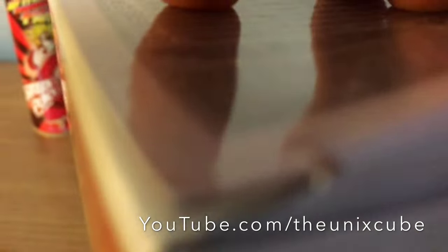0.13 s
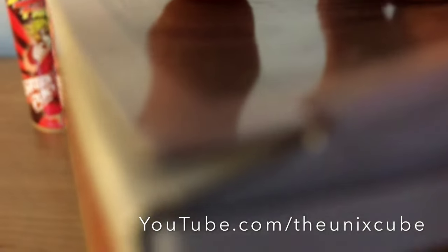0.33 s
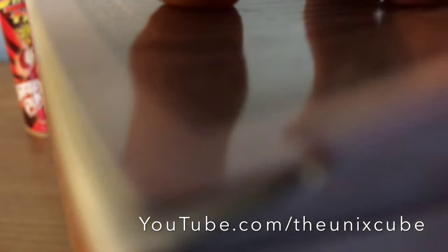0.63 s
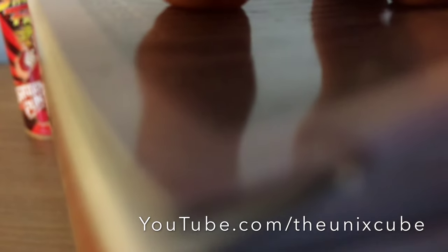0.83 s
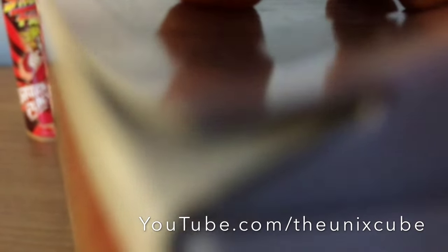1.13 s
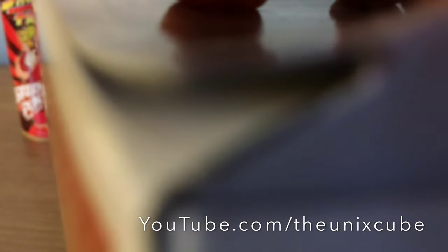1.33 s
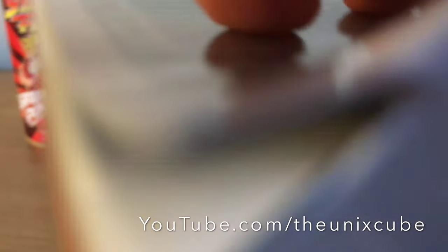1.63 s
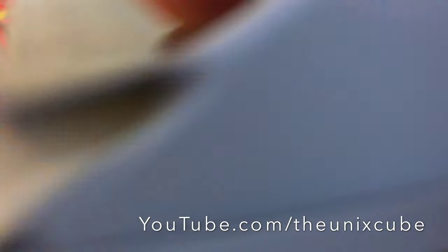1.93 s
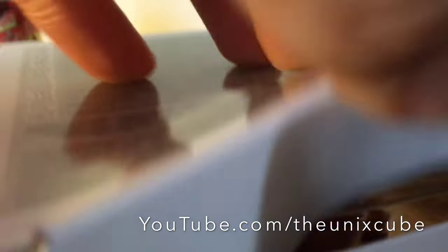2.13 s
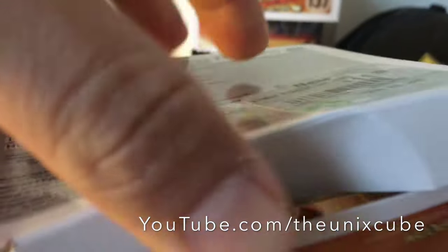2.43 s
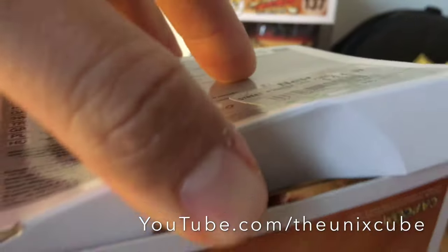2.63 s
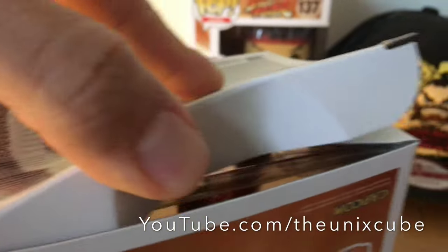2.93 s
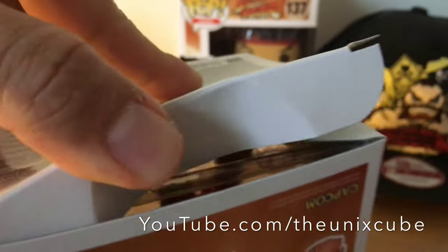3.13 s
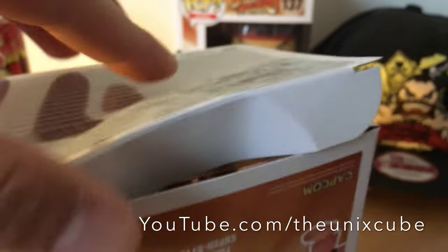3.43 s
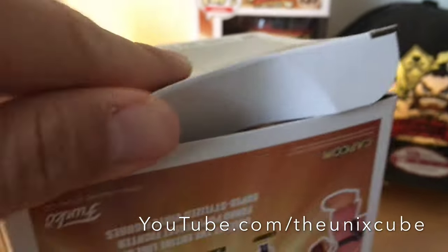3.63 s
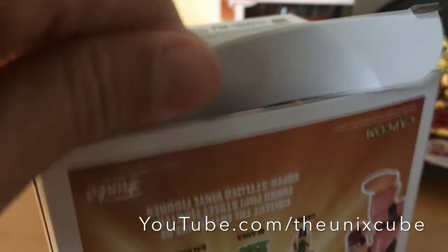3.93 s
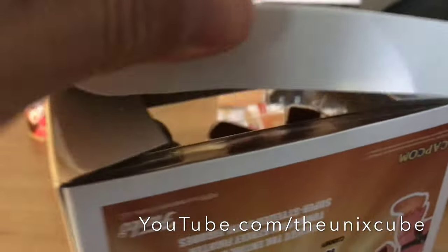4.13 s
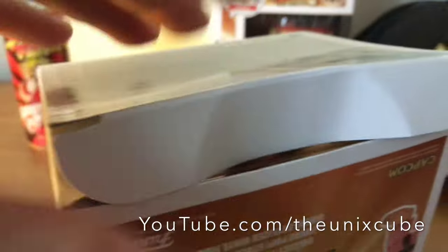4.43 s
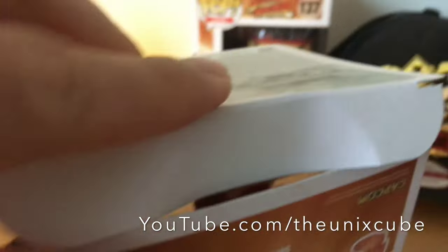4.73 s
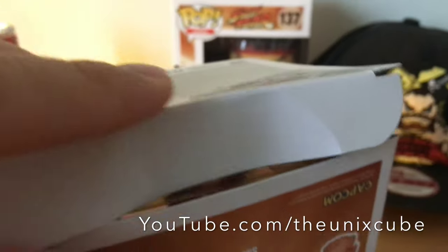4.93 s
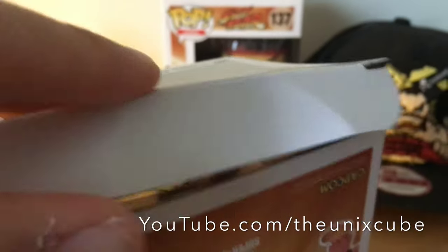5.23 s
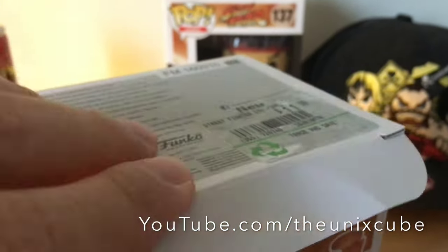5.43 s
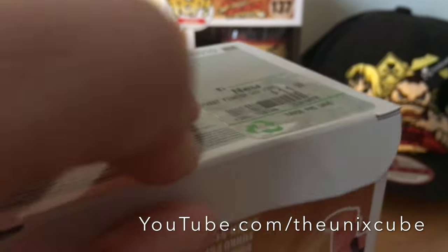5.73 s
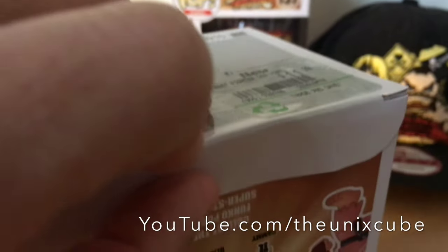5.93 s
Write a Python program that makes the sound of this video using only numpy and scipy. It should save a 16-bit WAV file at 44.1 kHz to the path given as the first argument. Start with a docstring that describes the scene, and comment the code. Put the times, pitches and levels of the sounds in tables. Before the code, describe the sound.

Fingers tap and scratch a small cardboard box up close, its tight flap creaking free in jerky steps with sharp hollow snaps in a quiet room.

```python
"""Faint taps and scratches come first, close to the microphone in a quiet room: fingers on a small cardboard box.
The tuck flap creaks out of its slot in stick-slip steps, and panels buckle or spring free with sharp snaps.
Each contact sums a bouncing patch of card, ringing box modes and a noisy wash of bending waves.
Strokes, a side tab rasping past the rim and handling are coloured friction noise.
Behind them lie the room's echo, still air, a faint mains hum and the microphone's hiss."""
import sys
import numpy as np
from scipy import signal
from scipy.fft import rfft, irfft
from scipy.io import wavfile

SR = 44100
rng = np.random.default_rng(int(sys.argv[2]) if len(sys.argv) > 2 else 0)


def materialize(psi):
    """Save the field psi as 16-bit PCM at rate SR to the path in sys.argv[1].

    A 1-D psi becomes a single channel; in a 2-D psi each row is a channel.
    """
    bounded = np.clip(np.atleast_2d(psi).T, -1, 1)
    quanta = np.round(bounded * 32767).astype(np.int16)
    wavfile.write(sys.argv[1], SR, quanta)


N = 268128
TIME = np.arange(N) / SR
CUTOFF_HZ = 16000


# the card buckles or springs free, close to the microphone; levels are before the trim in snaps():
# [t/s, body level/dB, thud, panel, flap and crack level/dB over the body,
#  bounce level/dB over the ring, hollow (body) bounce f/Hz, edge (flap) bounce f/Hz]
PANEL_SNAPS = [(1.6585, -13, -1.5, -2, -11.5, -5, 2.8, 489, 2647),
               (1.964, -19.5, -3, -8, -7, -13, 2.3, 520, 3340),
               (2.2294, -21.5, -1.5, 2.5, 5.5, -14, 2.8, 520, 2480),
               (3.269, -22, -10.5, -3, 3, -16.5, 3.9, 539, 2640),
               (4.0015, -22, -11.5, -4.5, -5, 0, 1.7, 662, 2540),
               (4.0742, -21, -2.5, -2.5, -6, 1, 1, 415, 2640),
               (4.3443, -23.5, -12, -2.5, -8, -19, 2.8, 690, 2570),
               (5.8516, -15, -12.5, -18, -17, -21.5, 4.3, 407, 2430)]


def snaps():
    """A panel flips over: its own bounce outweighs the ring of the box."""
    rows = np.array(PANEL_SNAPS)
    pitches = patch_pitches(rows, octaves=.15)
    bounce_db, pitches[:, 1], pitches[:, 3] = rows[:, -3:].T
    sound = strike(rows[:, :-3], pitches, damping=1.2, crush_s=0.00038,
                   bounce_db=bounce_db[:, None], flex_db=-2, fine_db=3.5)
    return from_db(-1.08) * sound


# the tuck flap jerks along its slot: [t/s, body level/dB before the trim in creak()]
FLAP_SLIPS = [(1.093, -40), (1.112, -42.5), (1.130, -37.5), (1.159, -40.5), (1.169, -37.5), (1.200, -40),
              (1.210, -39.5), (1.2415, -31), (1.265, -35), (1.277, -33.5), (1.291, -37.5), (1.3259, -28.5),
              (1.3317, -34), (1.4038, -27), (1.4306, -29.5), (1.4388, -33), (1.4616, -28.5), (1.5008, -28),
              (1.508, -33.5), (1.5392, -27.5), (1.551, -33), (1.5726, -28.5), (1.614, -26), (1.619, -32.5),
              (1.6388, -33.5), (1.6651, -24.5), (1.675, -29.5)]
# a harder slip is brighter; rows are thud, panel, flap, crack:
# [level/dB over the body in a firm slip, dB gained per dB of force]
FORCE_COLOUR = [(-4.5, -0.07), (0, .5), (-10, 1.06), (-15.5, 0.73)]
FIRM_SLIP_DB = -28.5
# after each slip the flap stutters once more, weaker; the mean gap is given
STUTTER_S, STUTTER_LOSS_DB = 0.0053, 5.5


def creak():
    """The flap sticks and slips along its slot; harder slips carry more treble."""
    slips = np.array(FLAP_SLIPS)
    firm_db, per_db = np.transpose(FORCE_COLOUR)
    colour_db = firm_db + per_db * (slips[:, 1:] - FIRM_SLIP_DB)
    rows = repeated(np.c_[slips, colour_db], STUTTER_S, STUTTER_LOSS_DB)
    pitches = patch_pitches(rows, octaves=.45)
    sound = strike(rows, pitches, damping=0.94, crush_s=.00015, bounce_db=-1.0, flex_db=-0.5, fine_db=3.5)
    return from_db(-0.16) * sound


# fingertips and nails land on the card; levels are before the trim in touches():
# [t/s, body level/dB, thud of the pad level/dB over the body, brightness of the nail/dB]
FINGER_TOUCHES = [(0.072, -62, 16, -13), (0.274, -49.5, -2, -9.5), (0.340, -59, 11.5, -2),
                  (0.359, -68.5, 19, -18), (0.410, -59.5, 0, 0.5), (0.676, -47.5, 5, -56),
                  (0.777, -56, 2.5, -22), (0.824, -50.5, 10, -50), (0.855, -49, 6.5, -6.5),
                  (0.907, -52, 2, -10), (0.940, -48.5, 3.5, -22.5), (1.002, -53.5, 12, -5.5),
                  (1.021, -38.5, -3, -46), (1.070, -56.5, 17.5, -7.5), (1.367, -59, -5, -1),
                  (1.396, -47, -3, -8), (1.731, -61.5, 0, 9.5), (1.858, -54.5, -2, -9),
                  (2.087, -45.5, -17, -11.5), (2.136, -40, -1, -11), (2.153, -32.5, -12, -27),
                  (2.165, -32.5, -2.5, -19), (2.174, -33.5, -8, -14.5), (2.19, -43, -4, -14),
                  (2.371, -43.5, 3, -18), (2.596, -57, 3, -16.5), (2.796, -55.5, -0.5, -5.5),
                  (3.183, -57, 4.5, -0.5), (3.350, -51.5, 6.5, -8.5), (3.470, -45.5, 2.5, -16.5),
                  (3.507, -51.5, -1, -10.5), (3.548, -43.5, -1.5, -15), (3.565, -48, -6.5, -16.5),
                  (3.828, -55, -2.5, -15.5), (3.969, -42, 1, -9), (4.146, -47.5, -2, -20),
                  (4.193, -54, 10.5, -29), (4.259, -54, -18, -8.5), (4.338, -39.5, 5.5, -9),
                  (4.389, -40.5, -2, -25), (4.408, -44.5, -8.5, -33), (4.438, -48, -2, -26.5),
                  (4.556, -48.5, 4, -15.5), (4.587, -58.5, 9, -4), (4.639, -43, -1.5, -21.5),
                  (4.668, -47, -8, -44), (4.724, -42, 0.5, -20), (4.814, -45.5, -3.5, -26.5),
                  (4.862, -58, 7.5, -5), (4.883, -46.5, 8.5, -11), (4.922, -39.5, -4, -19.5),
                  (5.126, -50.5, -12.5, -27), (5.153, -45, -8, -12.5), (5.170, -38, -16, -10),
                  (5.193, -39.5, -13.5, -13), (5.368, -60, 0, -21.5), (5.417, -59.5, 8, -11.5),
                  (5.446, -50, -7.5, -9), (5.496, -38.5, -16, -36), (5.5385, -50.5, 1, -5),
                  (5.584, -47.5, 5, -20.5), (5.692, -58.5, 2, -1.5), (5.756, -42.5, -1, -32),
                  (5.774, -47, -14, -55), (5.792, -54, 6, -14)]
# the more nail, the more treble; rows are panel, flap, crack: [level/dB over the body, share of the brightness]
NAIL_COLOUR = [(1.5, 0.3), (3, 1.0), (0.5, 1.0)]
# a finger settles with one more, softer contact; the mean gap is given
SETTLE_S, SETTLE_LOSS_DB = 0.01, 12


def touches():
    """Light taps and picks on the card: the pad gives the thud, the nail the treble."""
    taps = repeated(FINGER_TOUCHES, SETTLE_S, SETTLE_LOSS_DB)
    base_db, share = np.transpose(NAIL_COLOUR)
    rows = np.c_[taps[:, :3], base_db + share * taps[:, 3:]]
    pitches = patch_pitches(rows, octaves=.4)
    sound = strike(rows, pitches, damping=0.99, crush_s=.0007, bounce_db=-3, flex_db=2.0, fine_db=1.5)
    return from_db(0.48) * sound


def repeated(rows, gap_s, loss_db):
    """Follow each contact (s, dB, ..) with one weaker contact at an uneven gap."""
    first = np.array(rows, float)
    again = first.copy()
    again[:, 0] += gap_s * rng.uniform(.7, 1.3, len(first))
    again[:, 1] -= loss_db
    return np.vstack([first, again])


# the patch of card under a contact, one row per register, before pitch scatter and damping:
# [bounce f/Hz, bounce t60/s, bending-wave t60/s]
CARD_PATCH = [(220, .028, .075), (480, .014, .05), (1300, .008, .033), (2500, .007, .022),
              (4100, .003, .024)]


def patch_pitches(contacts, octaves):
    """Every contact finds patches of a different size: (contacts, registers) in Hz."""
    size = rng.uniform(-1, 1, (len(contacts), len(CARD_PATCH)))
    return np.array(CARD_PATCH)[:, 0] * 2 ** (octaves * size)


# edges of the thud, body, panel, flap and crack registers: [f/Hz]
REGISTER_EDGES = [55, 280, 750, 1900, 3300, 15900]
# modes of the box: [f/Hz, level/dB relative within its register, t60/s at damping 1]
BOX_MODES = [(61, -13, 0.04), (116, -5, 0.04), (204.5, 6, 0.037), (266.2, 0, 0.034), (352, -0.5, 0.099),
             (372, -6.5, 0.048), (457, 5, 0.038), (591, 10.5, 0.021), (648.7, 2, 0.074), (925, -5, 0.054),
             (996, -3.5, 0.018), (1117, 0, 0.034), (1620, -5, 0.014), (1570, 0.5, 0.018), (1810, -4, 0.018),
             (1980, 5, 0.011), (2480, 1.5, 0.024), (2500, -9.5, 0.006), (3550, -2.5, 0.011),
             (4070, -1, 0.0075), (6070, -6, 0.0063), (8800, -3.5, .002)]
# random spread of a mode's strength with the place of contact (standard deviation, dB)
SCATTER_DB = 3
# a soft contact loses its highest waves: dB of them per dB of crack
SOFTNESS = 0.62


def strike(rows, pitches, damping, crush_s, bounce_db, flex_db, fine_db):
    """Each contact bounces a patch of card, rings the box modes and leaves a short wash of bending waves."""
    t = np.arange(SR // 10) / SR
    # the body is the reference, 0 dB over itself
    levels = rows[:, 1:2] + np.insert(rows[:, 2:], 1, 0, axis=1)
    # the fibres give way over a moment
    crush = 1 - np.exp(-t / crush_s)
    sounds = np.zeros((len(rows), len(t)))
    for k, (low, high) in enumerate(zip(REGISTER_EDGES, REGISTER_EDGES[1:])):
        _, bounce_t60, flex_t60 = CARD_PATCH[k]
        bounce = np.sin(2 * np.pi * pitches[:, k:k + 1] * t) * dying(t, bounce_t60)

        hz, db, t60 = np.transpose([mode for mode in BOX_MODES if low <= mode[0] < high])
        modes = np.sin(2 * np.pi * hz[:, None] * t) * dying(t * damping, t60[:, None])
        strengths = from_db(db + SCATTER_DB * rng.standard_normal((len(rows), len(hz))))
        # a contact falls on either side of a mode's nodal line
        ring = (strengths * rng.choice([-1, 1], strengths.shape)) @ modes

        wash = rng.standard_normal(sounds.shape) * crush * dying(t * damping, flex_t60)
        flex = band(wash, low, high, order=1)
        is_crack = high == REGISTER_EDGES[-1]
        wash_db = fine_db + SOFTNESS * rows[:, -1:] if is_crack else flex_db

        wave = unit_energy(ring)
        wave = wave + from_db(bounce_db) * unit_energy(bounce)
        wave = wave + from_db(wash_db) * unit_energy(flex)
        # neighbouring registers have opposite polarity
        sounds += (-1) ** k * from_db(levels[:, k:k + 1]) * unit_energy(band(wave, low, high))
    # levels are rms over 10 ms
    sounds *= np.sqrt(SR / 100)
    out = np.zeros(N + len(t))
    for s, sound in zip(rows[:, 0], sounds):
        start = round(s * SR)
        out[start:start + len(t)] += sound
    return out[:N]


# the side tab dragged past the rim: [t/s, level/dB]
TAB_DRAG = [(3.995, -50), (4.004, -29), (4.016, -25.5), (4.026, -24.5), (4.046, -21.5), (4.054, -25.5),
            (4.072, -38.5), (4.08, -85.5)]
# colour of the rasp: [f/Hz, relative level/dB per Hz]
TAB_COLOUR = [(60, -2.5), (130, -3), (400, -7), (640, 0), (850, -11.5), (1600, -10), (2400, -2),
              (3100, -14), (4800, -15.5), (6000, -8.5), (7500, -15), (9500, -16), (15500, -29.5)]


def tab_rasp():
    """The cut edge of the tab runs fast over the rim, catching as it goes."""
    moving = (TIME > TAB_DRAG[0][0]) & (TIME < TAB_DRAG[-1][0])
    # the catching swings the level by 2.2 dB rms
    catching = from_db(2.2 * rms_one(band(rng.standard_normal(N), 60, 260, order=2)))
    grain = coloured(catching * fibres(per_s=16000, spread_db=1.0), TAB_COLOUR)
    return moving * gain_curve(TAB_DRAG) * grain


# fingers and card edges rubbing, and the card crunching just before the snaps at 1.96 s and 5.85 s: [start t/s,
# end t/s, mid-stroke level/dB, treble gain/dB]
RUB_STROKES = [(0.436, 0.535, -62, -10), (1.074, 1.29, -51, -10.5), (1.384, 1.5, -50.5, -4),
               (1.627, 1.696, -24.5, -43), (1.953, 1.985, -27, -10.5), (2.074, 2.177, -40.5, -39),
               (2.146, 2.256, -40.5, -7.5), (2.865, 2.996, -61, -3.5), (3.214, 3.3, -53, -4.5),
               (3.63, 3.75, -61, -8), (3.847, 3.981, -55.5, -9), (4.057, 4.166, -45, -17),
               (4.288, 4.332, -55, 10.5), (4.537, 4.652, -51.5, -8), (5.149, 5.188, -38, -6.5),
               (5.437, 5.457, -47.5, 8.5), (5.481, 5.512, -37, -1.5), (5.702, 5.775, -72.5, 17),
               (5.843, 5.862, -28, -5.5)]
# colour of rubbing before each stroke's treble gain: [f/Hz, relative level/dB per Hz]
RUB_COLOUR = [(50, -5.5), (120, -6), (220, 1.5), (400, -4), (620, 1), (820, -9), (1200, -10), (2500, -13),
              (4500, -17.5), (9000, -23.5), (15000, -33.5)]
# a stroke catches and lets go: rms swing of its level (dB)
RUB_CATCH_DB = 3


def rubbing():
    """Short strokes over the card, catching unevenly, and brief crunches of card just before two snaps; a nail
    or a cut edge is brighter than a fingertip."""
    catching = from_db(RUB_CATCH_DB * rms_one(band(rng.standard_normal(N), 30, 180, order=2)))
    grain = coloured(catching * fibres(per_s=4000, spread_db=1.2), RUB_COLOUR)
    dull = signal.sosfiltfilt(signal.butter(2, 2200, fs=SR, output="sos"), grain)
    treble = grain - dull
    out = np.zeros(N)
    for start, end, level_db, bright_db in RUB_STROKES:
        progress = np.clip((TIME - start) / max(end - start, .005), 0, 1)
        pressure = np.sqrt(np.abs(np.sin(np.pi * progress)))
        out += from_db(level_db) * pressure * (dull + from_db(bright_db) * treble)
    return out


# the box shifts in the hands:
# [start t/s, end t/s, rustle of skin level/dB, hiss of sliding card level/dB]
HAND_SHIFTS = [(0.906, 1.68, -56, -87), (1.675, 2.25, -55.5, -63), (3.3, 3.62, -57.5, -70.5),
               (4.05, 4.47, -64.5, -60.5), (4.548, 4.95, -69.5, -80.5), (5.416, 5.602, -54, -69),
               (5.7, 5.994, -62, -78.5)]
# colour of skin on the hollow box: [f/Hz, relative level/dB per Hz]
SKIN_COLOUR = [(40, -6.5), (70, 7.5), (130, 5), (250, 2), (600, -2), (850, -5.5), (1400, -13), (2600, -23),
               (4000, -37.5), (15000, -54.5)]
# colour of sliding coated card: [f/Hz, relative level/dB per Hz]
SLIDE_COLOUR = [(100, -27), (1200, 9.5), (2600, 0.5), (4200, 0.5), (5500, -4.5), (9000, -1.5),
                (10500, -9.5), (15500, -10.5)]
# each shift swells and fades over this time; a faint rustle of resting fingers runs throughout
SHIFT_FADE_S, RESTING_DB = 0.078, -66


def handling():
    """Skin shifts on the hollow box, and coated card slides with a smooth hiss."""
    rustle, hiss = from_db(RESTING_DB), 0
    for start, end, rustle_db, hiss_db in HAND_SHIFTS:
        moving = np.clip(.5 + np.minimum(TIME - start, end - TIME) / SHIFT_FADE_S, 0, 1)
        rustle = rustle + from_db(rustle_db) * moving
        hiss = hiss + from_db(hiss_db) * moving
    skin = rustle * coloured(fibres(per_s=1400, spread_db=5.5), SKIN_COLOUR)
    slide = hiss * coloured(rng.standard_normal(N), SLIDE_COLOUR)
    return skin + slide


def fibres(per_s, spread_db):
    """Friction: paper fibres catch and let go at random, with uneven force."""
    caught = rng.random(N) < per_s / SR
    force = from_db(spread_db * np.minimum(rng.exponential(1, N), 4))
    return caught * rng.standard_normal(N) * force


# the room's echo, one row per band: [centre f/Hz, t60/s, level/dB relative to the direct sound]
ROOM_ECHO = [(141, 0.27, -15.5), (320, 0.13, -18), (520, 0.21, -10.5), (785, 0.14, -14),
             (1580, 0.15, -15.5), (2440, 0.29, -23.5), (3580, 0.16, -17), (9000, 0.28, -20)]


def room(x):
    """A diffuse tail that starts after the first reflection from the desk and walls."""
    t = np.arange(SR // 2) / SR
    centres = np.array(ROOM_ECHO)[:, 0]
    edges = np.r_[centres[0] / 2, np.sqrt(centres[1:] * centres[:-1]), CUTOFF_HZ]
    # silent for 4 ms, then a quick rise
    build_up = np.clip((t - .004) / 0.0021, 0, 1)
    echo = np.zeros(len(t))
    for (_, t60, db), low, high in zip(ROOM_ECHO, edges, edges[1:]):
        tail = unit_energy(band(rng.standard_normal(len(t)) * build_up * dying(t, t60), low, high))
        # the band's share of the spectrum sets its energy
        echo += from_db(db) * np.sqrt(2 * (high - low) / SR) * tail
    return signal.fftconvolve(x, echo)[:N]


# still air of the room: [f/Hz, relative level/dB per Hz]
AIR_COLOUR = [(15, -47), (25, -17), (37, -14.5), (59, 4), (183, -28), (537, -32), (1450, -34), (1570, -29),
              (2920, -39.5), (3530, -36), (5010, -45.5), (6380, -49.5), (15500, -45.5)]


def still_air():
    """The quiet room's air as steady coloured noise, -66 dB rms."""
    return from_db(-66) * coloured(rng.standard_normal(N), AIR_COLOUR)


def mains_hum():
    """A faint steady 60 Hz sine, -73.5 dB rms."""
    return from_db(-73.5) * np.sqrt(2) * np.sin(2 * np.pi * 60 * TIME)


# steady hiss of the room and the microphone: [f/Hz, relative level/dB per Hz]
HISS_COLOUR = [(350, -32.5), (600, -1), (1420, -2), (1770, -0.5), (2630, -7.5), (4130, -9.5), (15800, -16)]


def microphone_hiss():
    """Steady coloured noise of the room and the microphone, -73.5 dB rms."""
    return from_db(-73.5) * coloured(rng.standard_normal(N), HISS_COLOUR)


def from_db(db):
    """Decibels to gain."""
    return 10 ** (np.asarray(db) / 20)


def unit_energy(x):
    """Scale each row to energy 1."""
    return x / np.sqrt(np.sum(x ** 2, axis=-1, keepdims=True) + 1e-20)


def rms_one(x):
    """Scale to rms 1."""
    return x / np.sqrt(np.mean(x ** 2) + 1e-20)


def dying(t, t60):
    """Exponential decay, 60 dB down after t60."""
    return np.exp(-np.log(1000) * t / t60)


def gain_curve(rows):
    """Rows of (s, dB) as a gain per sample."""
    return from_db(np.interp(TIME, *np.transpose(rows)))


def band(x, low_hz, high_hz, order=3):
    """Causal band-pass."""
    edges = [low_hz, min(high_hz, SR / 2 - 1)]
    return signal.sosfilt(signal.butter(order, edges, "band", fs=SR, output="sos"), x)


def coloured(x, spectrum):
    """Give an excitation a spectrum, rolled off below its first frequency; rms 1."""
    hz, db = np.transpose(spectrum)
    bins = np.maximum(np.fft.rfftfreq(N, 1 / SR), 1)
    gain = from_db(np.interp(np.log(bins), np.log(hz), db))
    gain = gain * np.minimum(bins / hz[0], 1) ** 2
    return rms_one(irfft(rfft(x) * gain, N))


def scene():
    """The box up close, its echo in the room, then air, hum and hiss behind."""
    box = snaps() + creak() + touches() + tab_rasp() + rubbing() + handling()
    background = still_air() + mains_hum() + microphone_hiss()
    return (box + room(box) + background)[None]


def record(dry):
    """The highest peaks are rounded and the top is cut."""
    rounded = np.tanh(dry)
    return signal.sosfilt(signal.ellip(10, .1, 80, CUTOFF_HZ, fs=SR, output="sos"), rounded)


dry = scene()
out = record(dry)
materialize(out)
```